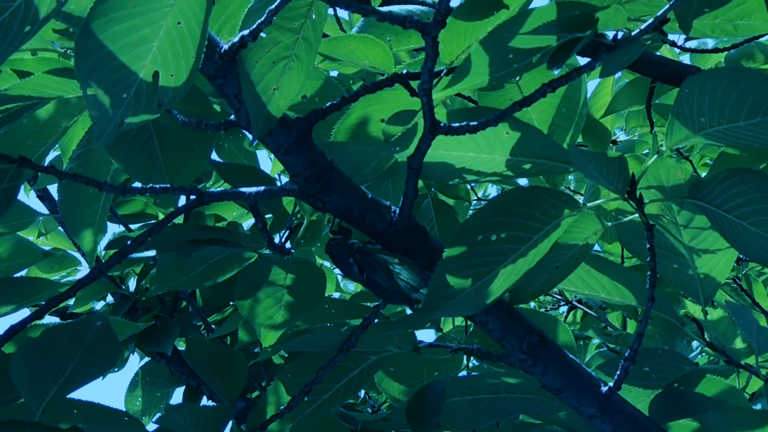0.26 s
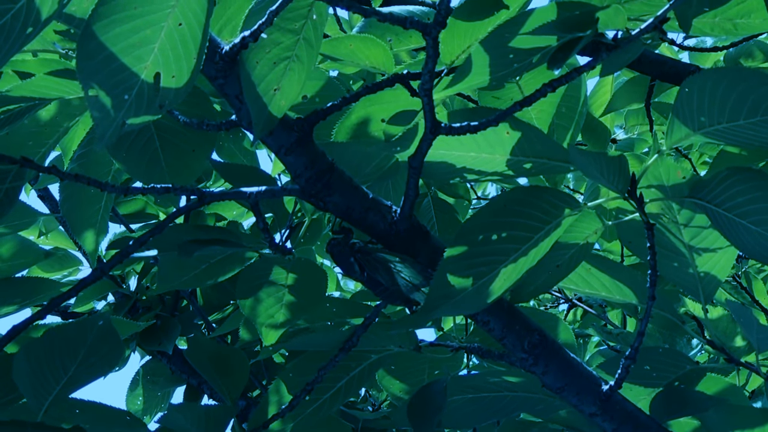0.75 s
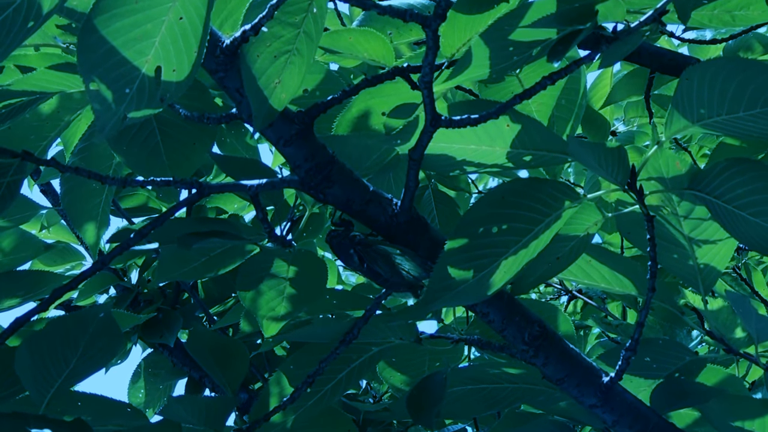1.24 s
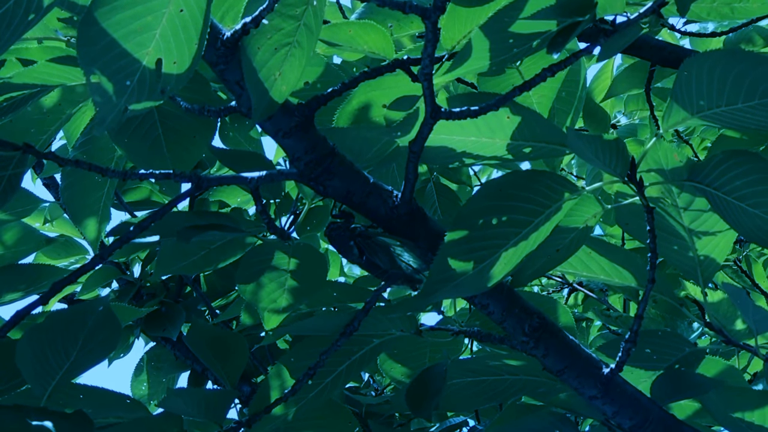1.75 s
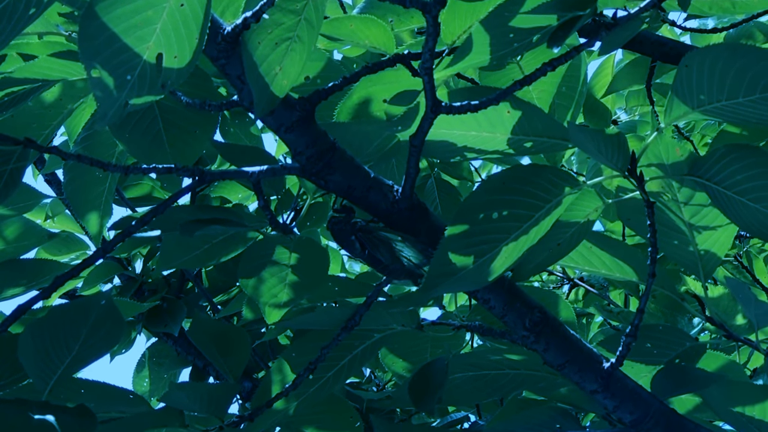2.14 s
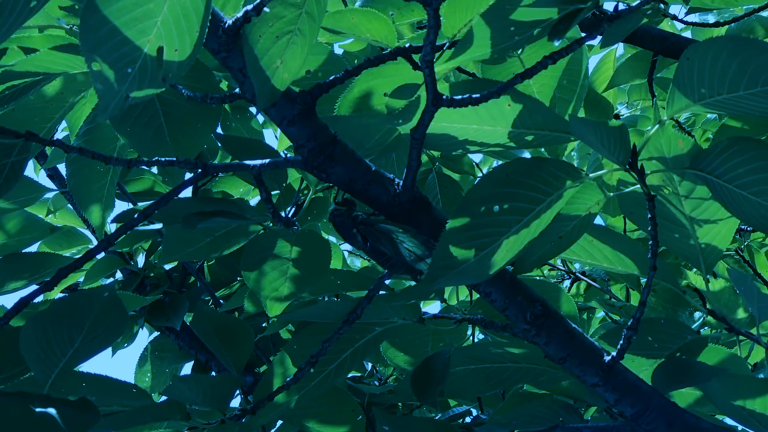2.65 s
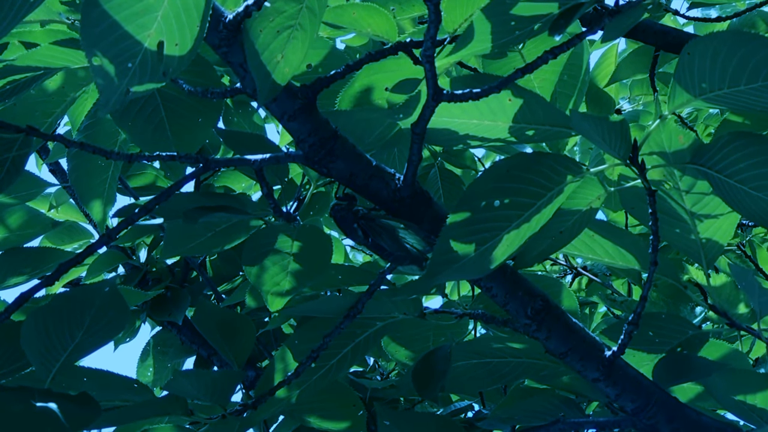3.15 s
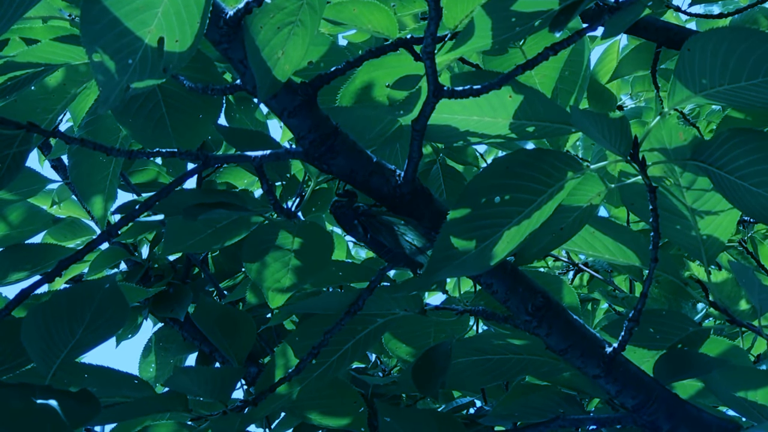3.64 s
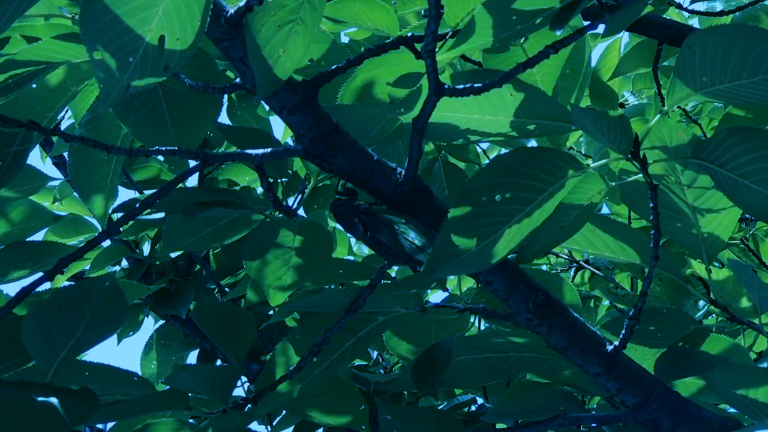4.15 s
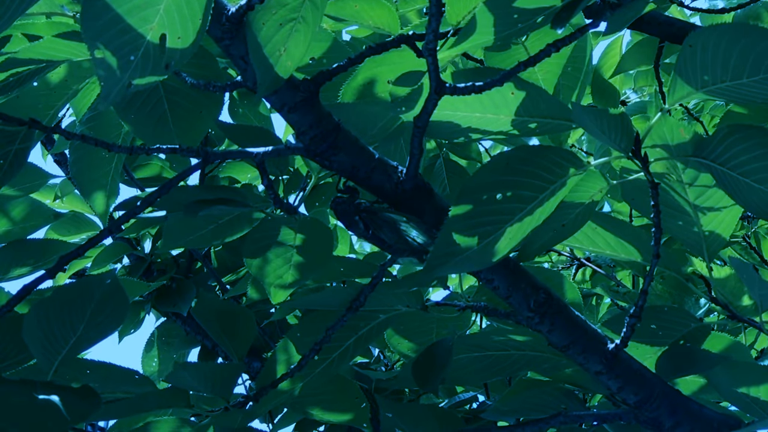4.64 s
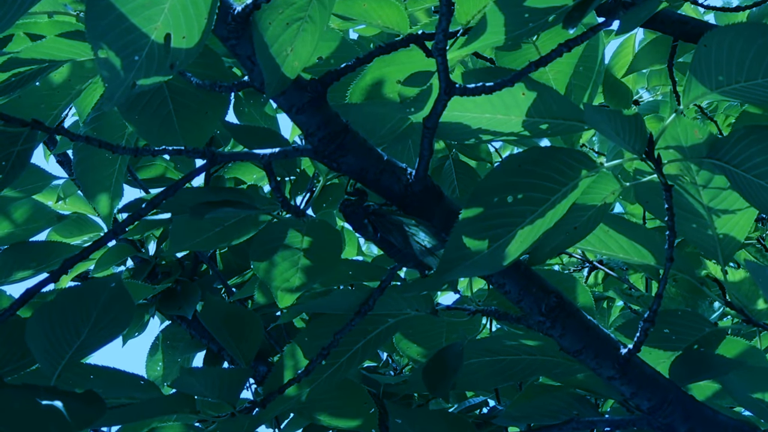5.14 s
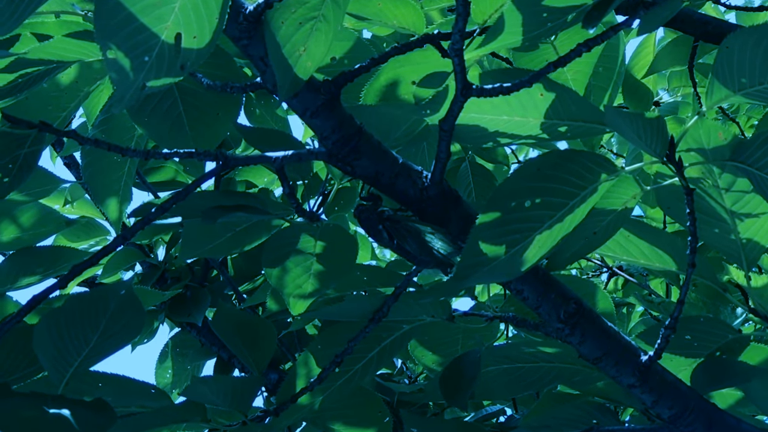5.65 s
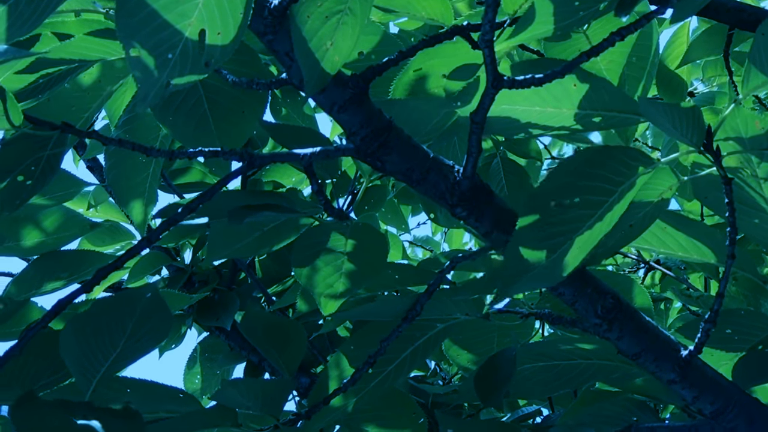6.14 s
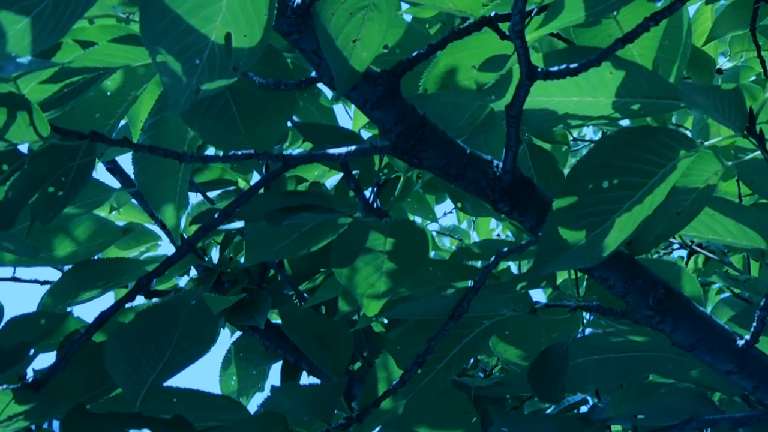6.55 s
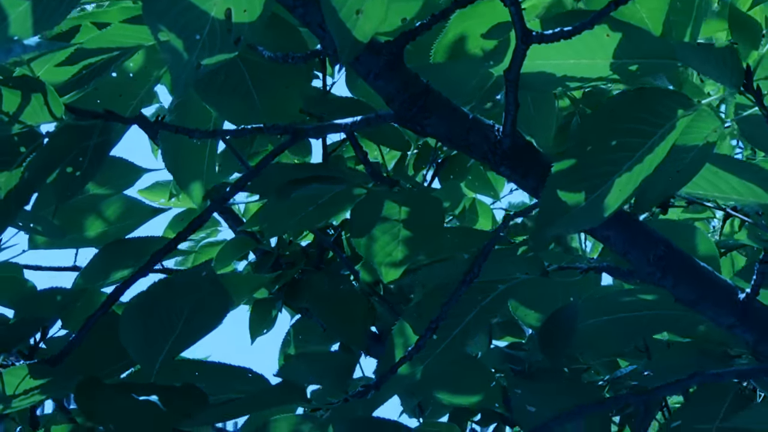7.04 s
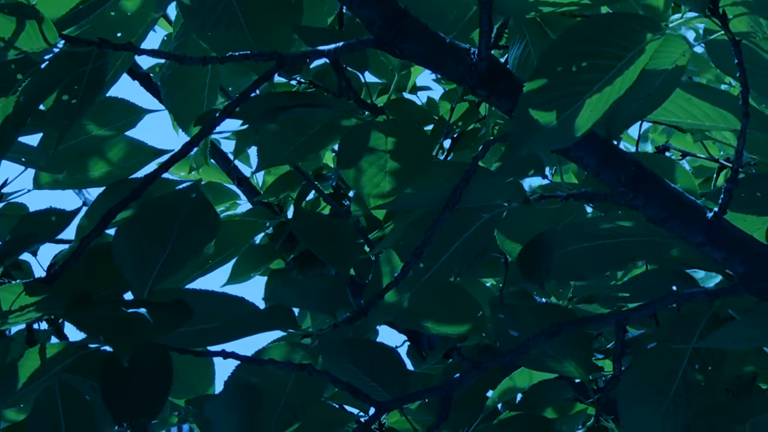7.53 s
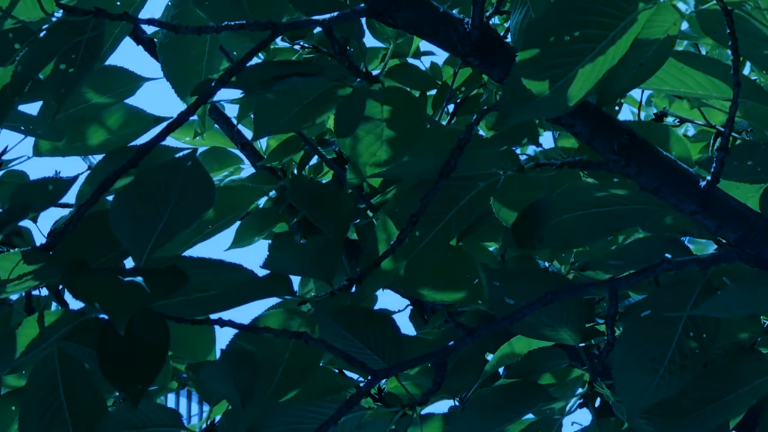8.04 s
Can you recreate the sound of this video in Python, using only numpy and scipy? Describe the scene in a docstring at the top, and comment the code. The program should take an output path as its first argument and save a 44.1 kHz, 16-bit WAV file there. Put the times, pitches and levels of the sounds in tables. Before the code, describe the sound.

Loud, bright cicada buzz throbbing five or six times a second in a leafy tree, then breaking off to a quieter far-off chorus.

```python
"""A near cicada sings in a leafy tree: its tymbals buckle some 180 times a second while the abdomen pumps
five and a half times a second, swinging the buzz between a low closed tone and a loud bright one.
Click trains and rasp drive body resonances; the song falters, sputters and stops.
Farther cicadas (same synthesis, regular song) and a chorus of shaped noise go on, over a low outdoor
rumble with faint hum sines; soft thumps at the microphone are decaying, darkening noise."""
import sys
import numpy as np
from scipy import signal
from scipy.fft import rfft, irfft, next_fast_len
from scipy.io import wavfile
from scipy.ndimage import uniform_filter1d, map_coordinates

SR = 44100
rng = np.random.default_rng(int(sys.argv[2]) if len(sys.argv) > 2 else 0)


def master(y):
    """Save y as 16-bit WAV."""
    cut = np.clip(np.atleast_2d(y).T, -1, 1)
    pcm = np.round(cut * 32767)  # scale
    wavfile.write(sys.argv[1], SR, pcm.astype(np.int16))


N = 365588
TIME_S = np.arange(N) / SR
CONTROL_TIME_S = TIME_S[::20]
FFT_SIZE = next_fast_len(N + 8192, True)
FREQS_HZ = np.maximum(np.arange(FFT_SIZE // 2 + 1) * SR / FFT_SIZE, 1)

# Outdoor rumble colour. Each row: frequency in Hz, relative density in dB.
RUMBLE_COLOUR = [(28, -32), (38, -2), (145, -2.5), (166, -7.5), (298, -13.5), (364, -13), (466, -17.5),
                 (862, -19), (960, -16.5), (1040, -18.5), (1250, -25), (1370, -11), (1500, -16.5),
                 (1950, -46), (3300, -120)]
# Faint machine hum. Each row: frequency in Hz, rms level in dB.
HUM_TONES = [(59.3, -63), (120, -63)]
# Thump colour. Each row: frequency in Hz, relative density in dB.
THUMP_COLOUR = [(15, -40), (28, -16), (48, -4), (118, -4), (157, -9.5), (241, -15.5), (450, -32),
                (600, -23.5), (1300, -26), (1690, -67), (2860, -120)]
# Soft thumps and rubs on the microphone. Each row: start in seconds, level in dB before the envelope,
# decay time in seconds, time to darken in seconds.
THUMP_EVENTS = [(.74, -44, .14, 0.27), (1.29, -39.5, .056, 0.023), (1.409, -41, 0.12, .12),
                (7.551, -30.5, 0.075, .045), (7.615, -32, 0.048, .002), (7.75, -45.5, 0.17, 0.043)]
# Distant cicadas' colour. Each row: frequency in Hz, relative density in dB.
CHORUS_COLOUR = [(650, -69), (1100, -27.5), (1620, -20), (2020, -11), (2310, -3.5), (2760, -3), (3180, 0),
                 (4590, 0), (6610, -7.5), (8810, -3.5), (9740, -7), (10600, -16.5), (13600, -21),
                 (14500, -34), (15500, -51)]
# Distant cicadas' loudness. Each row: time in seconds, rms level in dB.
CHORUS_LEVEL = [(0, -29.5), (5.5, -30.5), (6.2, -32.5), (6.5, -30), (8.29, -30)]
# Two farther singers. Each row: time of one shutting in seconds, stroke period in seconds,
# level in dB against the near one, frequency ratio of the body.
FAR_SINGERS = [(6.365, .1868, -15.8, .97), (7.4, .1795, -17.8, 1.04)]
# Body resonances at openings 0, 1, 2 and 3. Each row: frequency in Hz, width in Hz, level in dB.
CLOSED_MODES = [(2190, 550, -24.5), (2333, 200, -2), (2730, 149, -24), (3010, 100, -6.5),
                (3177, 520, -10.5), (3308, 380, -2.5), (3580, 110, 6.5), (3540, 200, -20), (3976, 170, 2.5),
                (4360, 370, -10.5), (4992, 1140, -18), (5630, 72, -14), (6800, 320, -19), (7200, 120, -39),
                (8600, 570, -39), (9500, 870, -32), (11083, 477, -27), (12450, 2000, -32),
                (14248, 5300, -41)]
SLACK_MODES = [(2020, 594, -31), (2610, 1200, -19.5), (3180, 89, -3), (3590, 460, 1.5), (3690, 1300, -9),
               (4500, 290, -4.5), (5000, 2600, -8), (6940, 820, -8), (8100, 540, -12), (9200, 890, -13.5),
               (11035, 823, -28), (12334, 1300, -22.6), (13839, 324, -34)]
HALF_OPEN_MODES = [(2150, 820, -18), (3440, 250, -2), (4320, 330, -5), (4600, 440, -6), (5270, 1900, -8.5),
                   (6800, 1200, -0.5), (7170, 510, 2), (8500, 840, -2.5), (8870, 680, -3),
                   (11061, 634, -30), (12300, 1100, -22), (13815, 276, -30)]
OPEN_MODES = [(2360, 690, -29), (2520, 84, -17), (3700, 190, -6.5), (3870, 180, -15), (4583, 158, -1.5),
              (4960, 64, -23), (5045, 78, -0.5), (4860, 1720, -8), (5095, 240, -0.5), (5370, 120, -4.5),
              (5640, 130, -12), (6710, 290, -4), (7140, 220, -10), (7270, 410, -6), (7720, 120, -8),
              (8530, 860, -5), (8630, 55, -4), (9184, 560, -2.5), (9360, 460, -9.5), (9890, 520, -10),
              (11010, 590, -18.5), (12200, 1313, -22.5), (13652, 630, -32), (14787, 663, -36)]
# Air sac resonances, ringing up late. Each row: frequency in Hz, width in Hz.
AIR_SAC_MODES = [(3500, 1500), (4950, 1300), (9100, 2200)]
# Main buckle, then the rib clicks of one tymbal cycle. Each row: share of the cycle, mean level in dB.
RIB_CLICKS = [(0, -2), (.207, -13), (.368, -10), (.474, -2), (.585, -7), (.795, -9.5)]
# The beat runs a little ahead or behind. Each row: time in seconds, delay in seconds.
RUBATO = [(0, 0), (.5, -.004), (1.3, .002), (2.3, -.003), (2.8, .007), (3.7, -.001), (4.7, -.003), (5.3, 0)]
# Uneven lifts as the song falters. Each row: shutting time in seconds, length in seconds, level in dB,
# opening 0-3, tymbal cycles per second, rasp in dB re clicks, frequency ratio, sag in dB.
FALTERING_LIFTS = [(5.426, .085, -19.5, 1.07, 198, 4, 1.01, 0.5),
                   (5.508, 0.1, -15.5, 2.95, 166, -4, 1, 6.5), (5.612, .085, -20, 1.3, 270, 0, 1, 4),
                   (5.724, .1, -15.5, 2.96, 166, -13, 1, 7), (5.816, .088, -19.4, 1.8, 275, 1, 1, 1),
                   (5.952, .13, -21.5, 1.04, 228, 1, 1, 3.5), (6.2, 0.23, -21, 0.93, 210, 11, 1.025, 0)]
# Low buzz between lifts: steady, then tiring. Each row: time in seconds, level in dB, opening 0-3,
# tymbal cycles per second, rasp in dB re clicks, frequency ratio.
LOW_BUZZ = [(5.29, -21.5, 0.025, 181, -5.5, 0.99), (5.351, -20.5, 0.65, 175, -4, 1),
            (5.64, -21, 0.47, 185, 4, 0.97), (5.87, -22.5, 0.42, 235, 16, 1),
            (5.97, -27.5, 0.83, 215, 13, 0.88), (6.031, -22.5, 0.9, 197, 8, 0.96)]
# Gaps in the final sputter. Each row: start in seconds, stop in seconds.
STUMBLES = [(6.051, 6.056), (6.162, 6.168)]

RUMBLE_RMS_DB = -53.5
FIRST_SHUT_S, STROKE_S, STROKES = .092, .1801, 30
# every regular lift makes the same bright note; openings past 3 are clipped
LIFT_S, BRIGHT_DB, BRIGHT_OPENING, BRIGHT_CYCLES_PER_S, BRIGHT_RASP_DB = .106, -15.5, 3.1, 166, -3
OPEN_S, SHUT_S = .033, .02
SWELL_WAIT_S, SWELL_S, FADE_S = .022, .022, .024  # loudness follows the opening late
BREAK_DB, BREAK_S = 2.14, .012  # brief dip where the low tone breaks into the bright one
SAG_DB, SAG_S, RECOVER_S = 5, .027, .016  # effort sags at each shutting and recovers
STOP_S = 6.172
CUTOFF_HZ = 15750


def from_db(db):
    """Decibels to gain."""
    return 10 ** (np.asarray(db) / 20)


def rms_one(x):
    """Scale to unit rms."""
    return x / np.sqrt(np.mean(x ** 2) + 1e-20)


def in_time(rows, at_s=TIME_S):
    """Read every column of a curve table at the given times."""
    time_s, *columns = np.transpose(rows)
    return [np.interp(at_s, time_s, column) for column in columns]


def filtered(x, response):
    """Pass a sound through a frequency response."""
    return irfft(rfft(x, FFT_SIZE) * response, FFT_SIZE)[:N]


def noise(colour):
    """Noise of a given colour, falling steeply beyond its ends; rms 1."""
    hz, db = np.transpose(colour)
    skirts = np.minimum(1, FREQS_HZ / hz[0]) ** 4 * np.minimum(1, hz[-1] / FREQS_HZ) ** 4
    gain = from_db(np.interp(np.log(FREQS_HZ), np.log(hz), db)) * skirts
    return rms_one(filtered(rng.standard_normal(N), gain))


def drift(per_s):
    """Slow random wander with a spread near 1."""
    return np.interp(TIME_S * per_s, np.arange(1000), rng.standard_normal(1000))


def detuning(hz, width_hz):
    """Distance from a resonance, in widths."""
    return (FREQS_HZ / hz - hz / FREQS_HZ) * hz / width_hz


def background():
    """Low outdoor rumble of shaped noise with a faint hum of sines."""
    hum = sum(from_db(db) * np.sqrt(2) * np.sin(2 * np.pi * hz * TIME_S) for hz, db in HUM_TONES)
    return from_db(RUMBLE_RMS_DB) * noise(RUMBLE_COLOUR) + hum


def thumps(rise_s=.004, boom_hz=260):
    """Each nudge of the microphone is a knock that darkens into a boom as it dies away."""
    knock = noise(THUMP_COLOUR)
    boom = filtered(knock, 1 / np.hypot(1, (FREQS_HZ / boom_hz) ** 2))
    out = 0
    for start_s, db, decay_s, darken_s in THUMP_EVENTS:
        age_s = np.maximum(TIME_S - start_s, 0)
        level = from_db(db) * (1 - np.exp(-age_s / rise_s)) * np.exp(-age_s / decay_s)
        out = out + level * (boom + np.exp(-age_s / darken_s) * (knock - boom))
    return out


def chorus():
    """Many distant cicadas merge into a sizzle of shaped noise."""
    level_db, = in_time(CHORUS_LEVEL)
    return from_db(level_db) * noise(CHORUS_COLOUR)


def foliage(x, wet_db, decay_s):
    """Leaves and branches scatter a dense, short cloud of echoes."""
    t_s = TIME_S[:SR // 5]
    echoes = rng.standard_normal(len(t_s)) * np.exp(-t_s / decay_s) * (t_s > .001)
    wet = from_db(wet_db)
    scattered = filtered(x, rfft(echoes / np.linalg.norm(echoes), FFT_SIZE))
    return (x + wet * scattered) / np.hypot(1, wet)


def air_sac():
    """All-pass response: each click swells into a short ringing packet."""
    detune = [detuning(hz, width_hz) for hz, width_hz in AIR_SAC_MODES]
    return np.exp(-2j * np.arctan(detune).sum(axis=0))


def body(modes):
    """Causal (minimum-phase) response of a set of steep-sided resonances."""
    power = sum(from_db(db) ** 2 / (1 + detuning(hz, width_hz) ** 2) ** 2 for hz, width_hz, db in modes)
    # folding the cepstrum gives minimum phase
    cepstrum = irfft(np.log(power + 1e-9) / 2, FFT_SIZE)
    cepstrum[1:FFT_SIZE // 2] *= 2
    cepstrum[FFT_SIZE // 2 + 1:] = 0
    return np.exp(rfft(cepstrum))


def tymbals(cycles_per_s, rasp_db, rasp_decay_cycles, wander=.006, buckle_jitter_s=.000008,
            rib_jitter_s=.000025, uneven_db=2.5):
    """Each cycle is a sharp buckle, a few rib clicks and a rasp dying behind the buckle."""
    cycles = np.cumsum(cycles_per_s * (1 + wander * drift(per_s=18))) / SR
    count = np.arange(1, int(cycles[-1]))
    clicks = np.zeros(N)
    for k, (share, db) in enumerate(RIB_CLICKS):
        late, size = rng.standard_normal((4000, 2))[:len(count)].T
        jitter_s = rib_jitter_s if k else buckle_jitter_s
        click_s = np.interp(count + share, cycles, TIME_S) + late * jitter_s
        index = np.clip((click_s * SR).astype(int), 0, N - 1)
        clicks[index] += from_db(db + uneven_db * size)
    rasp = rng.standard_normal(N) * np.exp(-(cycles % 1) / rasp_decay_cycles)
    return rms_one(rms_one(clicks) + from_db(rasp_db) * rms_one(rasp))


def voice(drive, opening, bodies):
    """Abdomen opening blends neighbouring sets of resonances; the short-term level is evened out."""
    opening = np.clip(opening, 0, len(bodies) - 1)
    buzz = 0
    for k, response in enumerate(bodies):
        weight = np.sqrt(np.maximum(0, 1 - abs(opening - k)))
        buzz = buzz + weight * rms_one(filtered(drive, response))
    power = uniform_filter1d(uniform_filter1d(buzz ** 2, size=250), size=250)
    return buzz / np.sqrt(power + 1e-9)


def ramp(start_s, rise_s, stop_s, fall_s):
    """Attack, hold and release between 0 and 1."""
    rise = (CONTROL_TIME_S - start_s) / rise_s
    fall = (stop_s - CONTROL_TIME_S) / fall_s
    return np.clip(np.minimum(rise, fall), 0, 1)


def regular_lifts(shuttings_s):
    """The same bright note at every beat, in the columns of the faltering lifts."""
    note = (LIFT_S, BRIGHT_DB, BRIGHT_OPENING, BRIGHT_CYCLES_PER_S, BRIGHT_RASP_DB, 1, SAG_DB)
    return [(shut_s, *note) for shut_s in shuttings_s]


def muscles(lifts, low_buzz):
    """Lifts pull the low buzz brighter, then sag; gives level, opening, cycle rate, rasp, tension."""
    low_db, *low_shape = in_time(low_buzz, CONTROL_TIME_S)
    rest = np.array(low_shape)
    level_db, shape = low_db, rest
    for shut_s, length_s, db, *lifted, sag_db in lifts:
        start_s = shut_s - length_s
        swell_s = start_s + SWELL_WAIT_S
        shape = shape + ramp(start_s, OPEN_S, shut_s, SHUT_S) * (np.array(lifted)[:, None] - rest)
        swell = ramp(swell_s, SWELL_S, shut_s, FADE_S)
        dip = ramp(swell_s - BREAK_S, BREAK_S, swell_s + BREAK_S, BREAK_S)
        since_shut_s = CONTROL_TIME_S - shut_s
        sag = np.clip(since_shut_s / SAG_S + 1, 0, 1) * np.exp(-np.maximum(since_shut_s, 0) / RECOVER_S)
        level_db = level_db + swell * (db - low_db) - BREAK_DB * dip - sag_db * sag
    controls = uniform_filter1d(np.vstack([level_db, shape]), size=9)  # muscles cannot jump
    return [np.interp(TIME_S, CONTROL_TIME_S, control) for control in controls]


def far_cicadas(bodies, swing=1.9):
    """Cicadas of other sizes sing the regular song from other trees, smeared by the leaves."""
    out = 0
    for shut_s, period_s, distance_db, ratio in FAR_SINGERS:
        beats_s = np.arange(shut_s % period_s, TIME_S[-1] + period_s, period_s)
        level_db, opening, cycles_per_s, _, _ = muscles(regular_lifts(beats_s), LOW_BUZZ[:1])
        level_db = level_db.max() + swing * (level_db - level_db.max())  # bright notes carry best
        own_bodies = [np.interp(FREQS_HZ / ratio, FREQS_HZ, response) for response in bodies]
        drive = tymbals(cycles_per_s, rasp_db=5.5, rasp_decay_cycles=1.0)
        out = out + voice(drive, opening, own_bodies) * from_db(level_db + distance_db)
    return foliage(out, wet_db=-4.0, decay_s=.025)


def near_cicada(bodies):
    """Regular strokes of buzzing tymbals through the body, then the faltering end and a sudden stop."""
    beats_s = FIRST_SHUT_S + STROKE_S * np.arange(STROKES)
    delay_s, = in_time(RUBATO, beats_s)
    lifts = regular_lifts(beats_s + delay_s) + list(FALTERING_LIFTS)
    level_db, opening, cycles_per_s, rasp_db, tension = muscles(lifts, LOW_BUZZ)
    singing = (TIME_S < STOP_S) * 1.0
    for start_s, stop_s in STUMBLES:
        singing[(TIME_S > start_s) & (TIME_S < stop_s)] = 0
    # a tighter body rings faster: synthesize on its own clock, then read back in real time
    clock = np.cumsum(tension) - 1
    controls = (opening, cycles_per_s / tension, rasp_db)
    opening, cycles_per_s, rasp_db = [np.interp(np.arange(N), clock, c) for c in controls]
    buzz = voice(tymbals(cycles_per_s, rasp_db, rasp_decay_cycles=.85), opening, bodies)
    song = map_coordinates(buzz, [clock], order=5) * from_db(level_db)
    return foliage(song * uniform_filter1d(singing, size=60), wet_db=-12, decay_s=.005)


def scene():
    """Background, thumps, chorus and far singers behind the near cicada."""
    ring_up = air_sac()
    bodies = [body(modes) * ring_up for modes in (CLOSED_MODES, SLACK_MODES, HALF_OPEN_MODES, OPEN_MODES)]
    mix = background() + thumps() + chorus() + far_cicadas(bodies) + near_cicada(bodies)
    return mix[None]


def record(dry):
    """Steep elliptic low-pass at the cutoff."""
    lowpass = signal.ellip(12, .1, 80, CUTOFF_HZ, fs=SR, output="sos")
    return signal.sosfilt(lowpass, dry)


dry = scene()
out = record(dry)
master(out)
```